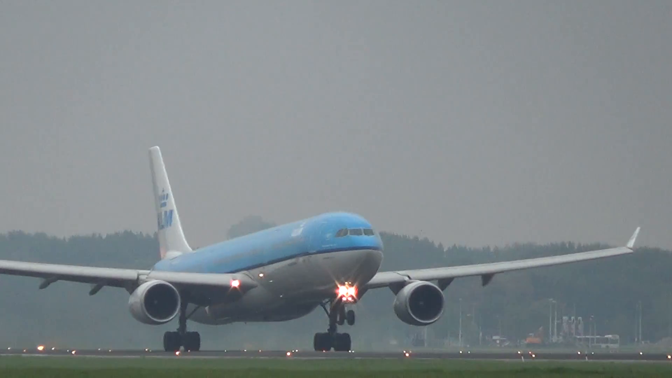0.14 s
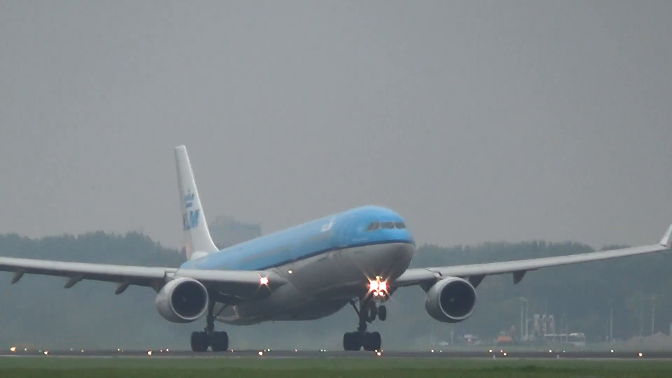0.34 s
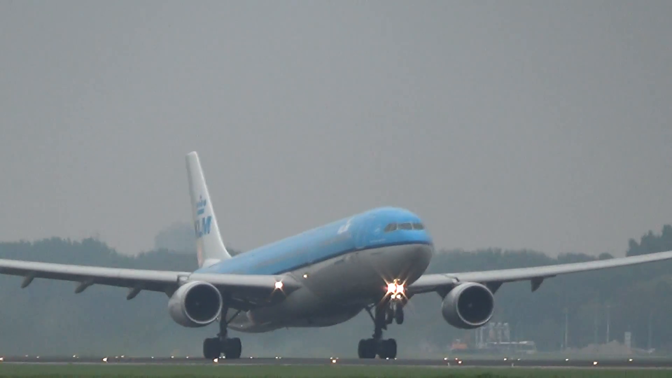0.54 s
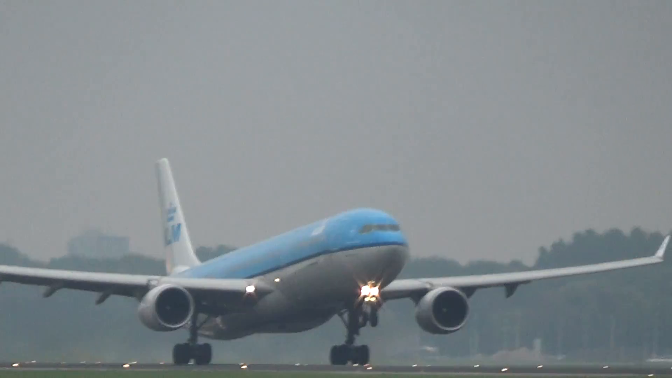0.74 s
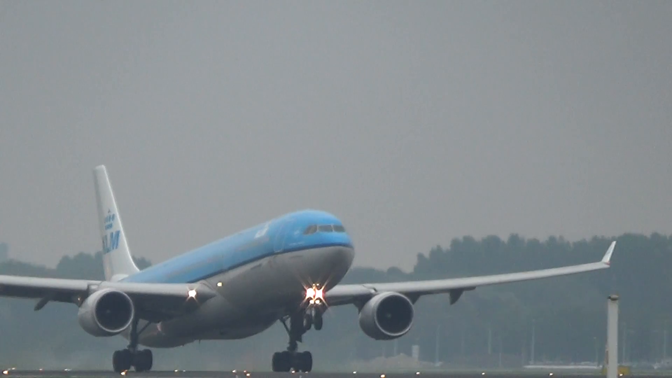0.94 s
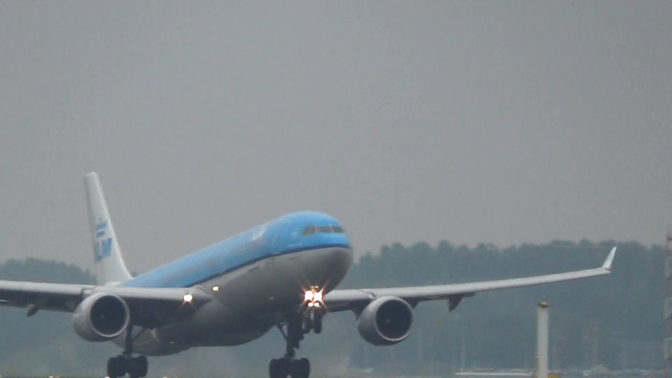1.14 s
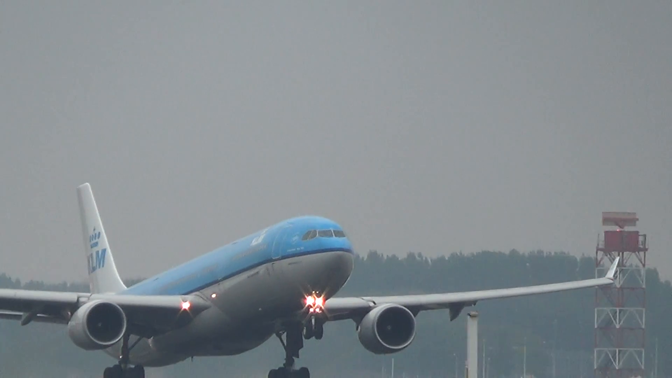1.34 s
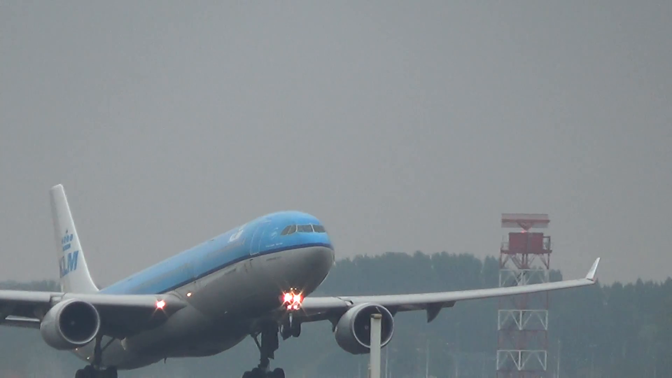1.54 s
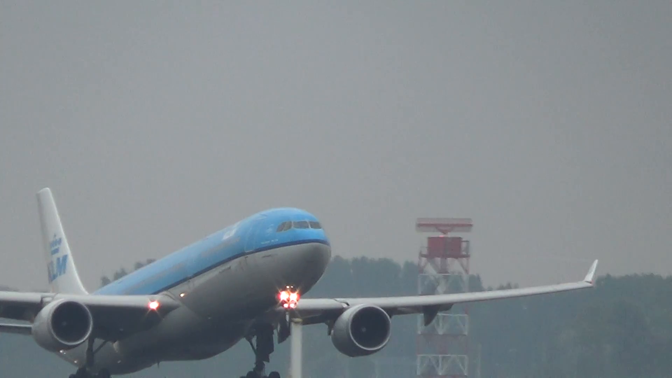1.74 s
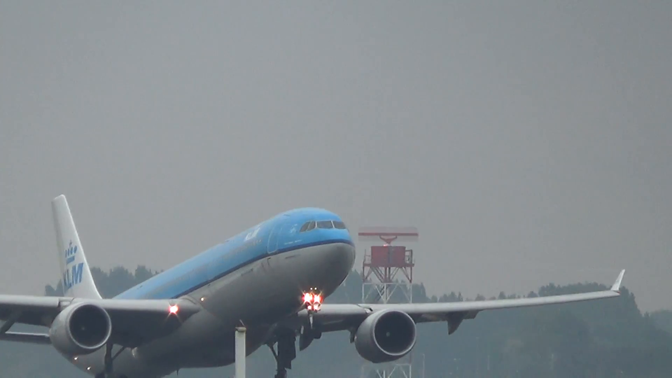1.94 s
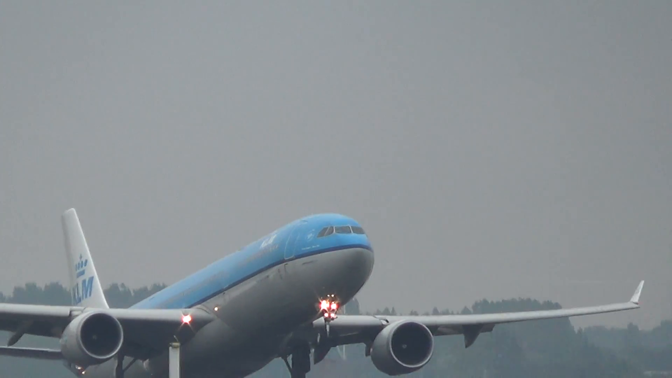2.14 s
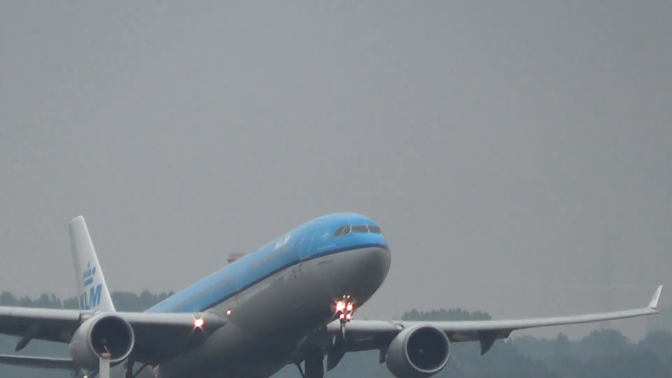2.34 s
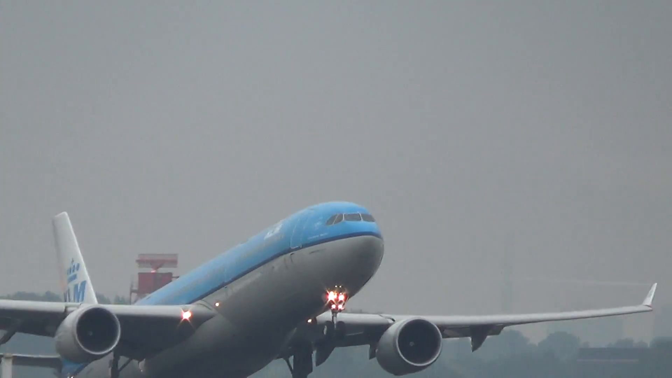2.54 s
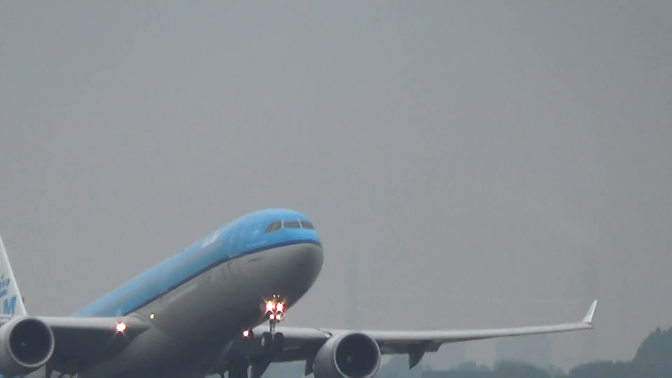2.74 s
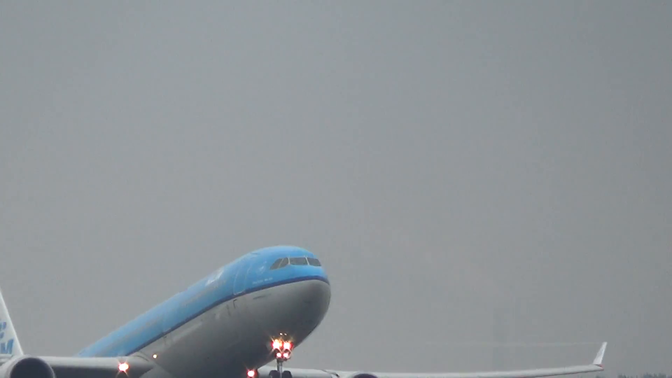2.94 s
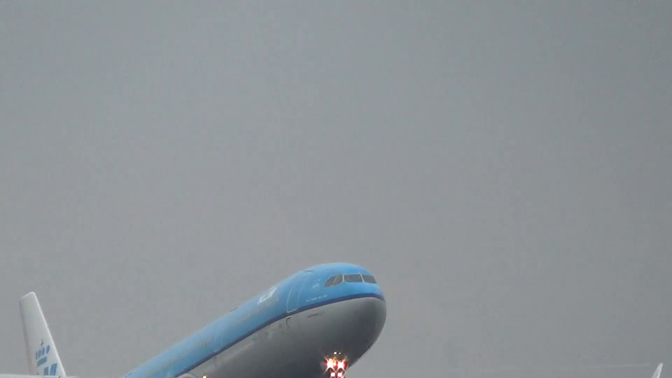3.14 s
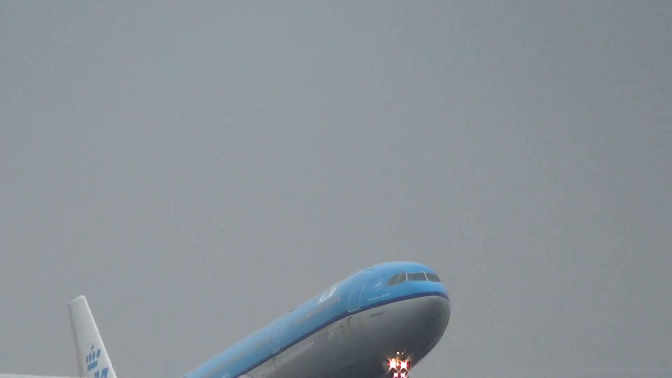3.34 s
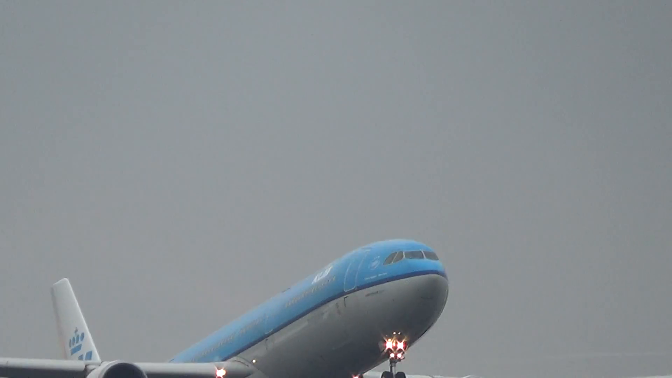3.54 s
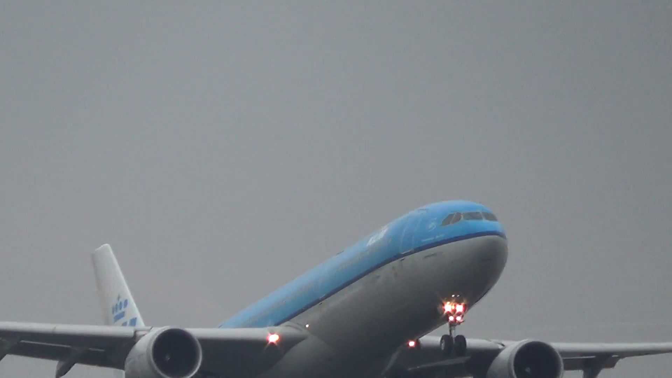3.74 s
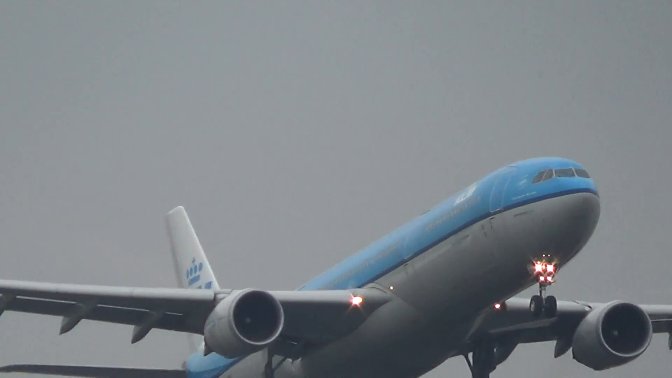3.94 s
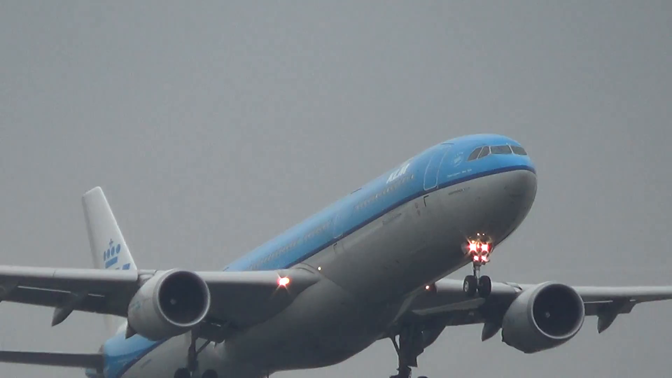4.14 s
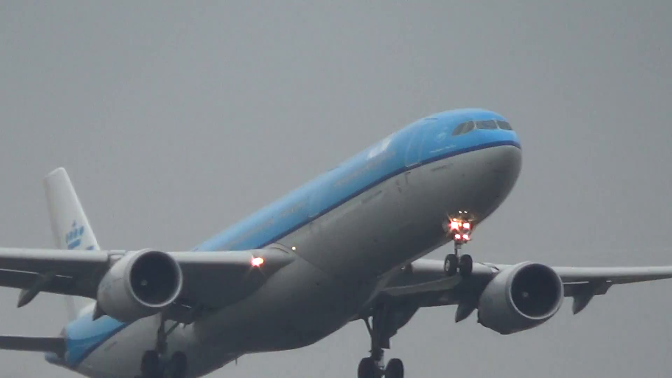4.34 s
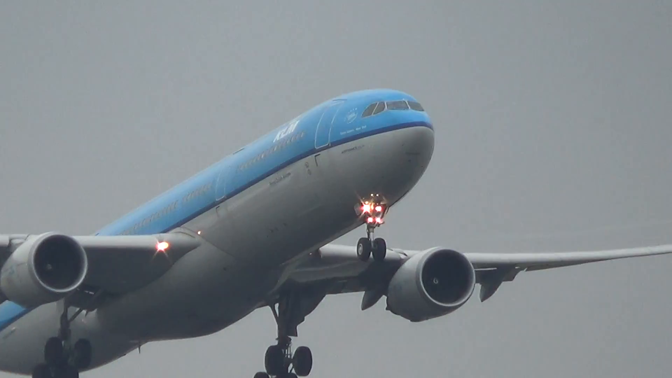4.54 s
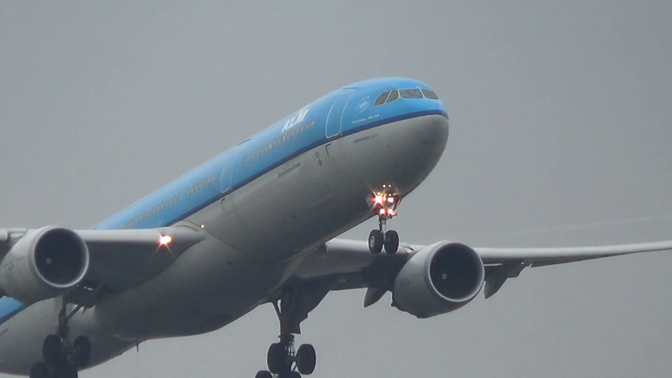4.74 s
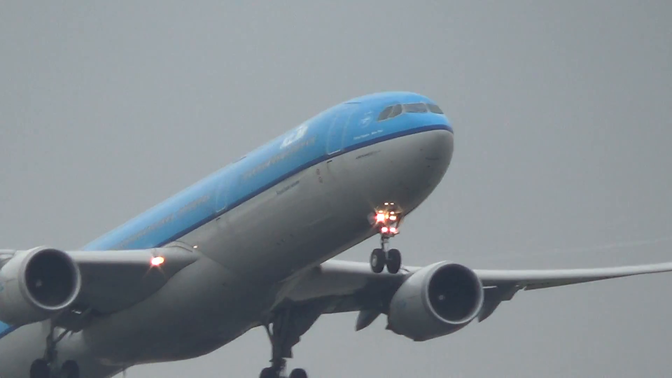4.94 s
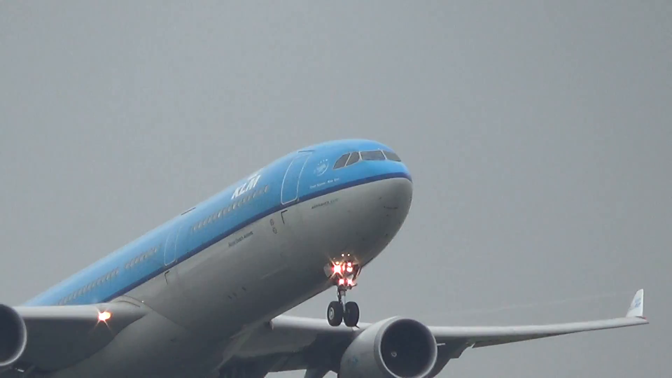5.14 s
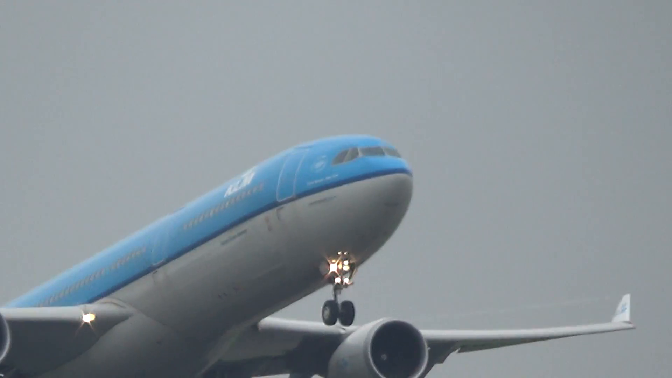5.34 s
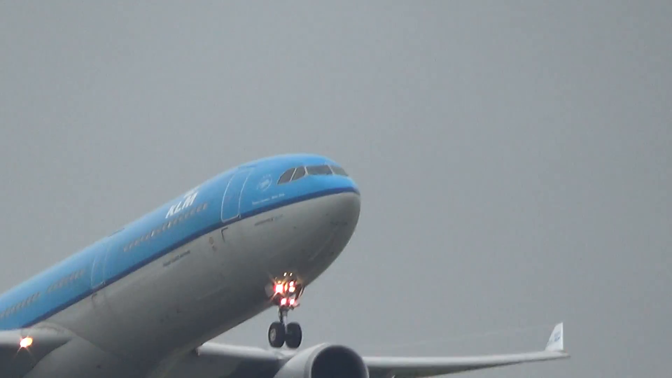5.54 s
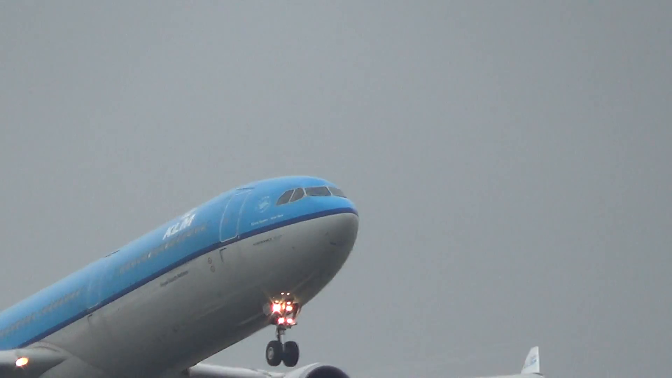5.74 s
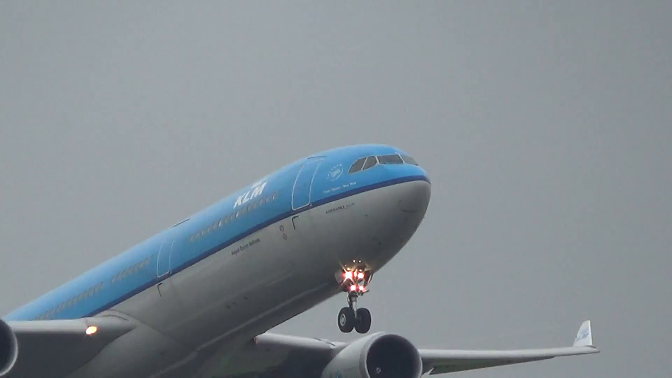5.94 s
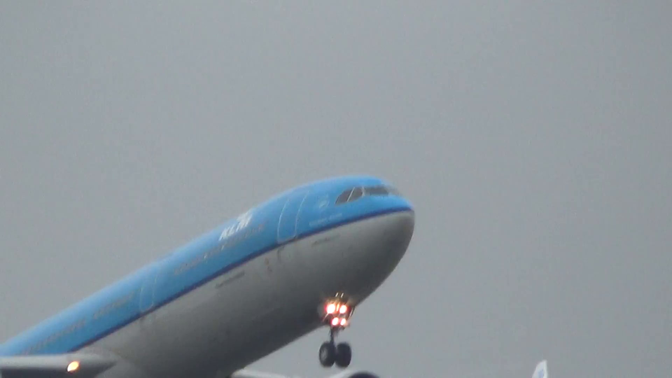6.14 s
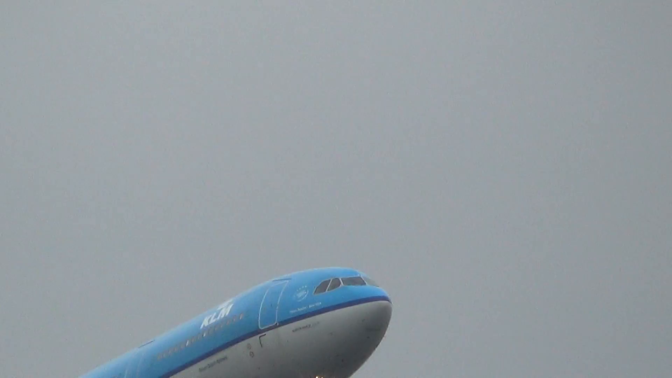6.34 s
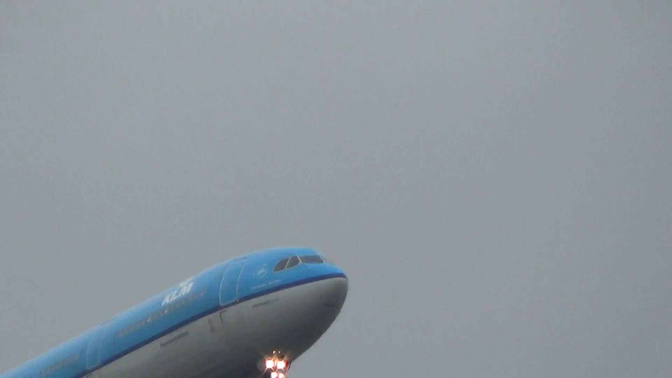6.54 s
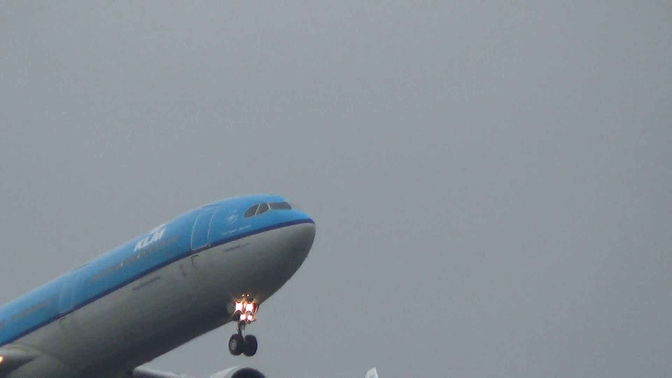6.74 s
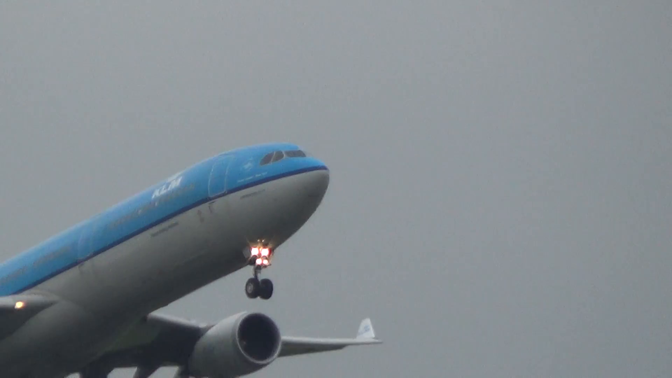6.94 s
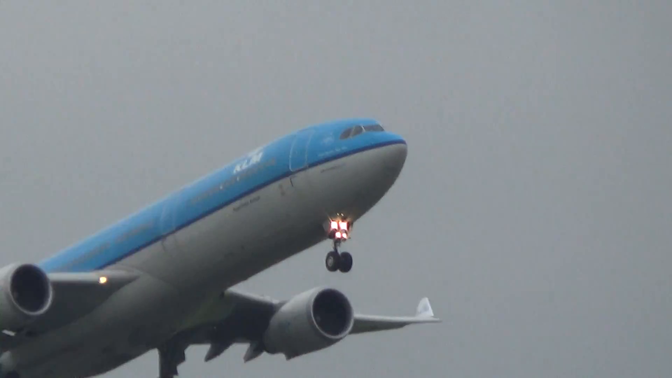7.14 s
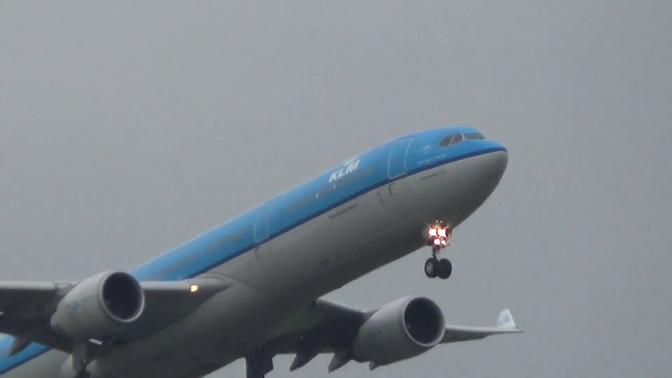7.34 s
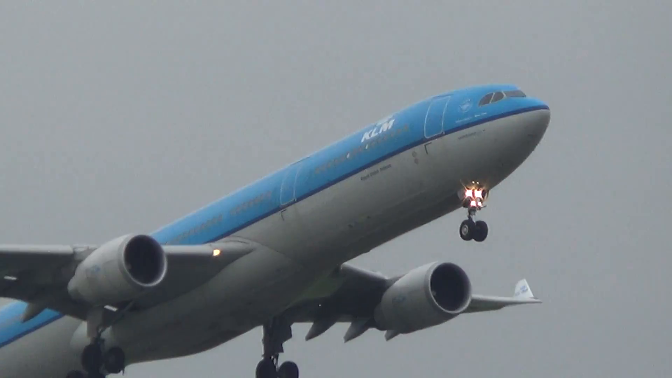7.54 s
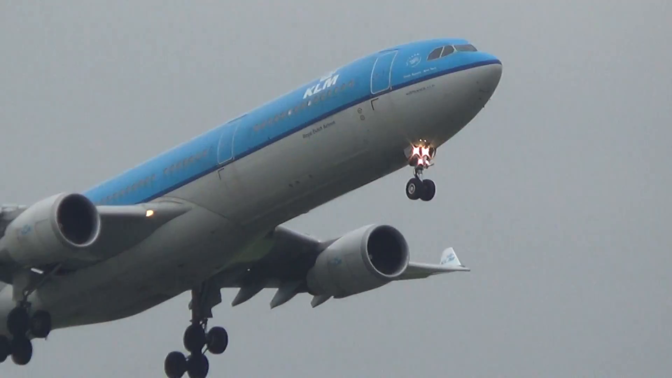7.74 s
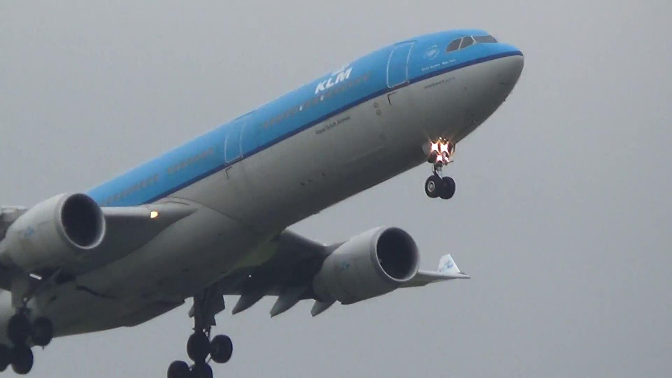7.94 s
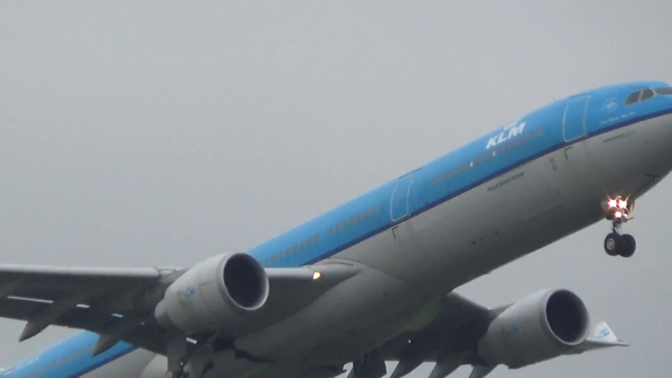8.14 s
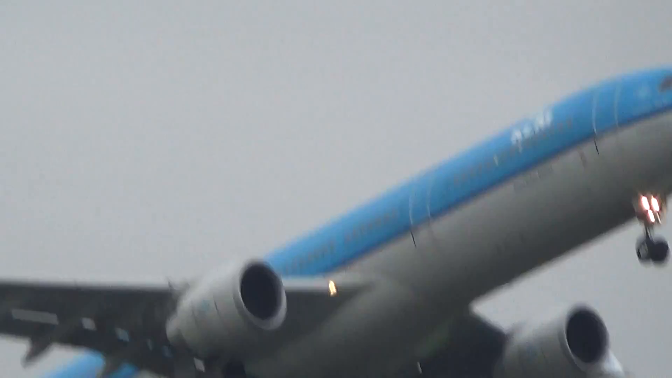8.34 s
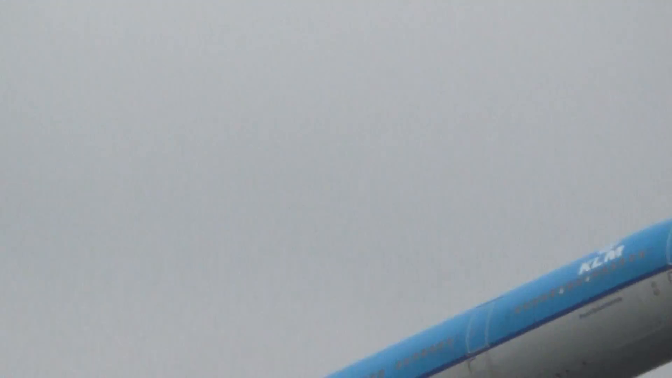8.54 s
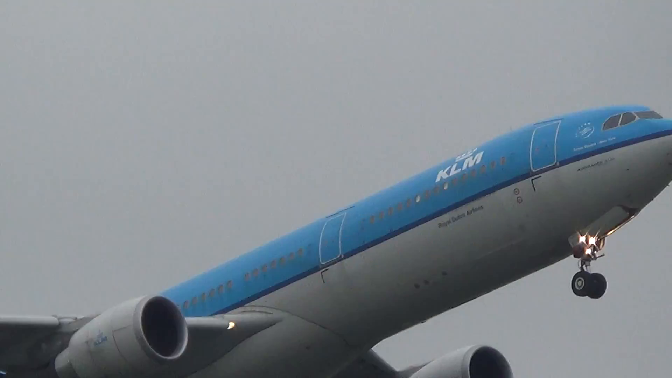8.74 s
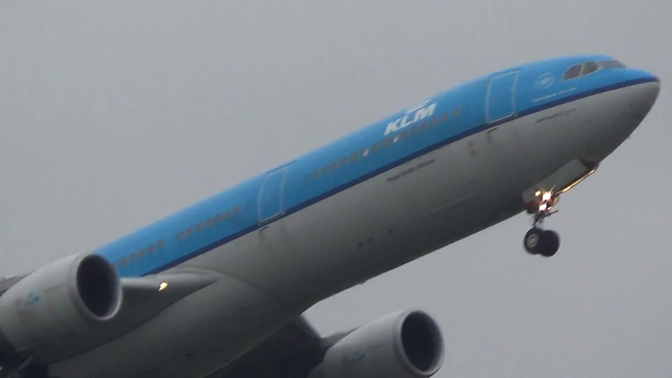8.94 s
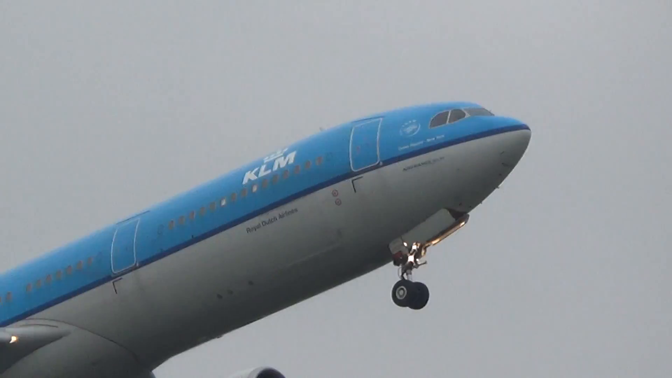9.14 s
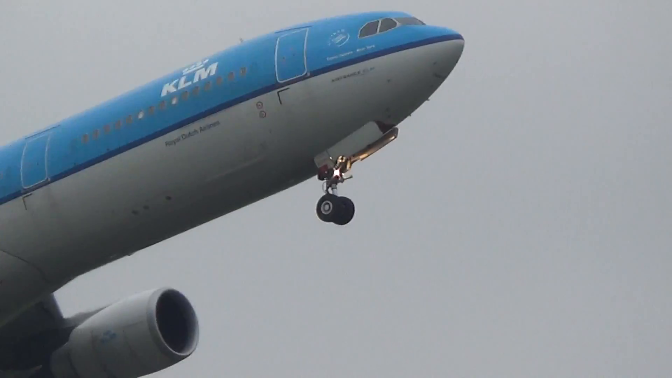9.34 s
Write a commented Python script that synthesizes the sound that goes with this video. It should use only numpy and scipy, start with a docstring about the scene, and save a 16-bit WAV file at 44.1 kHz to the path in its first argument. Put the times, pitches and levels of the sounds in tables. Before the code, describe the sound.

A small stereo microphone in gusty open air picks up a jetliner taking off. Wind thumps and flutters close by, with thin hiss, a very faint high whistle and a few dry handling ticks. The distant engine rush steadily grows louder and brighter. A brief harsh gust masks it late on; afterward the roar comes in waves with a strong, fluttering fan tone that finally sinks slightly in pitch. The aircraft never passes before the end.

```python
"""A twin-engine airliner at takeoff thrust runs towards the listener, over 9.5 seconds.
First it is far off: a dull fan rush and whine, wind on a small camera, ticks, hiss and a thin whistle.
As it nears, the fans grow louder and brighter; their pitch creeps up, then sinks towards the end.
Just before 7 s a sharp gust hisses and the level dips; then jet roar and whine come on strongly.
Rush, roar and wind are shaped noise, the whine is sines and narrow noise, the ticks are noise bursts."""
import sys
import numpy as np
from scipy.fft import rfft, irfft, next_fast_len
from scipy.io import wavfile

SR = 44100
rng = np.random.default_rng(int(sys.argv[2]) if len(sys.argv) > 2 else 0)


def to_wav(sig):
    """Store sig (one row per channel, or 1-D mono) as 16-bit WAV at the path in sys.argv[1].

    Samples outside -1..1 are clipped; the rate is SR.
    """
    pcm = np.clip(np.atleast_2d(sig), -1, 1) * 32767
    pcm = np.round(pcm).astype(np.int16)
    wavfile.write(sys.argv[1], SR, pcm.T)  # frames by channels


N = 418509
TIME = np.arange(N) / SR
SIZE = 2 * next_fast_len(N // 2 + 1, True)
FREQS = np.maximum(np.arange(SIZE // 2 + 1) * SR / SIZE, 1)
CUTOFF_HZ = 15850  # top of the sound


def from_db(db):
    """Decibels to gain."""
    return 10 ** (np.asarray(db) / 20)


def in_time(rows):
    """Each column of a curve, read at every sample."""
    seconds, *columns = np.transpose(rows)
    return [np.interp(TIME, seconds, column) for column in columns]


def over_hz(points):
    """A table over log frequency, read at every bin."""
    hz, value = np.transpose(points)
    return np.interp(np.log(FREQS), np.log(hz), value)


def white():
    """Random spectrum of white noise."""
    return rng.standard_normal(len(FREQS)) + 1j * rng.standard_normal(len(FREQS))


def unit_in_band(gain, band):
    """Scale a spectrum so that its noise has rms 1 between two frequencies."""
    inside = (FREQS > band[0]) & (FREQS < band[1])
    return gain * SIZE / (2 * np.sqrt(np.sum(gain[inside] ** 2)))


def to_wave(spectrum):
    """From frequency bins to samples."""
    return irfft(spectrum, SIZE)[..., :N]


def noise(gain, band=(0, SR)):
    """Noise of the given colour, with rms 1 inside the band."""
    return to_wave(white() * unit_in_band(gain, band))


def drift(rate_hz):
    """A slow random curve of spread 1, changing about rate_hz times a second."""
    return noise(1 / (1 + (FREQS / rate_hz) ** 2))


def narrow_noise(phase, width_hz):
    """A tone smeared into a narrow band by two random envelopes; rms 1."""
    return drift(width_hz) * np.cos(phase) + drift(width_hz) * np.sin(phase)


def swell(middle_s, width_s):
    """A smooth rise and fall of height 1 around a moment."""
    return np.exp(-np.minimum(((TIME - middle_s) / width_s) ** 2, 50))


def swelling(rows):
    """Brief swells with two rises each, added up into two level curves in dB."""
    return sum(np.outer(rises_db, swell(middle_s, width_s)) for middle_s, width_s, *rises_db in rows)


# hiss and whistle sink steadily once the aircraft is near
HISS_START_DB, WHISTLE_START_DB, WHISTLE_HZ = -61.5, -64, 15625
FADE_FROM_S, HISS_FADE_DB_PER_S, WHISTLE_FADE_DB_PER_S = 5.7, 1.5, 1.5
# small ticks on the camera body: start_s, level_db (before the shared tick_trim_db)
TICKS = [(0.0987, -39), (.355, -39), (.4259, -42), (3.637, -29.5), (4.0433, -24), (5.822, -35),
         (7.5632, -36)]
# tone colour of a tick: pitch_hz, relative_level_db (per Hz)
TICK_COLOUR = [(1500, -22), (4200, 10.5), (6000, -3), (10000, -6), (15000, -21)]


def camera(tick_trim_db=-4.5, tick_decay_s=0.0022):
    """Preamplifier hiss, a thin electronic whistle and short dry ticks of the housing."""
    fading_s = np.maximum(TIME - FADE_FROM_S, 0)
    hiss_db = HISS_START_DB - HISS_FADE_DB_PER_S * fading_s
    whistle_db = WHISTLE_START_DB - WHISTLE_FADE_DB_PER_S * fading_s
    hiss_colour = from_db(over_hz([(1000, -5.5), (7000, 2.5), (15000, 0.0)]))
    hiss = from_db(hiss_db) * noise(hiss_colour, (4000, CUTOFF_HZ))
    whistle = from_db(whistle_db) * np.sqrt(2) * np.sin(2 * np.pi * WHISTLE_HZ * TIME)
    bursts = 0
    for start_s, level_db in TICKS:
        decay = np.exp(-np.minimum(np.abs(TIME - start_s) / tick_decay_s, 20))
        bursts = bursts + from_db(level_db + tick_trim_db) * (TIME >= start_s) * decay
    return hiss + whistle + bursts * noise(from_db(over_hz(TICK_COLOUR)))


# faint high notes that swell now and then: middle_s, width_s, pitch_hz, level_db
SINGING = [(2.55, 0.23, 3210, -53), (5.92, 0.15, 3050, -45)]


def singing(width_hz=80):
    """Faint narrow bands of noise that rise and sink again."""
    notes = 0
    for middle_s, width_s, pitch_hz, level_db in SINGING:
        note = narrow_noise(2 * np.pi * pitch_hz * TIME, width_hz)
        notes = notes + from_db(level_db) * swell(middle_s, width_s) * note
    return notes


# the steady wind under the gusts: time_s, level_db
BREEZE = [(0, -38.5), (1.2, -32), (3.6, -28.5), (5.5, -32.5), (5.95, -21.5), (6.85, -22), (7.3, -28),
          (8.7, -25.5), (9.49, -31.5)]
# gusts on the microphone: middle_s, width_s, rise_db
GUSTS = [(.315, 0.017, 14.5), (.66, .05, 6), (.88, .025, 6), (1.48, 0.053, 4.5), (1.75, 0.055, 2.5),
         (2.24, 0.033, 3.5), (2.6, .09, 8.5), (2.739, .035, 10), (2.91, 0.063, 6), (3.16, 0.043, 5),
         (4.03, 0.022, 2.5), (4.6, 0.091, 4), (4.89, 0.028, 4.5), (6.92, 0.019, 5.5), (7.82, 0.28, 5),
         (9.05, 0.046, 0.5)]


def wind_strength():
    """Buffeting in dB: the breeze, and the rise of the gusts that ride on it."""
    breeze_db = in_time(BREEZE)[0]
    gust_db = sum(rise_db * swell(middle_s, width_s) for middle_s, width_s, rise_db in GUSTS)
    return breeze_db, gust_db


# slow air pressure on the camera body: pitch_hz, relative_level_db (per Hz)
RUMBLE = [(12, -22.5), (40, -5), (70, 9.5), (120, -6), (300, -28), (2000, -100)]


def rumble(level_db=-49.0, lump_db=2.5, follow=0.68):
    """Large eddies press on the whole camera, much alike at both ports and harder in gusts."""
    _, gust_db = wind_strength()
    colour = from_db(over_hz(RUMBLE))
    ports = noise(colour) + .45 * np.array([noise(colour), noise(colour)])
    return ports * from_db(level_db + follow * gust_db + lump_db * drift(10))


SHARP_GUST_FROM_S, SHARP_GUST_TO_S = 6.78, 6.96


def sharp_gust():
    """1 while the sharp gust blows, 0 otherwise, with edges of 20 ms."""
    inside_s = np.minimum(TIME - SHARP_GUST_FROM_S, SHARP_GUST_TO_S - TIME)
    return np.clip(inside_s / .02 + .5, 0, 1)


SHARP_GUST_DB = -15
# tone colour of the buffeting: pitch_hz, relative_level_db (per Hz)
WIND = [(20, -40.5), (45, -31), (80, -6), (130, 0.5), (220, 2), (350, -0.5), (550, -6.5), (900, -14),
        (1600, -27), (3200, -35), (7000, -58), (15000, -82)]
# tone colour of the sharp gust's hiss: pitch_hz, relative_level_db (per Hz)
PORT_HISS = [(100, -14.5), (380, 4.5), (800, -4.5), (1600, -9), (3000, -29.5), (6000, -61), (15000, -85)]
# how far the left port leads the right: pitch_hz, lead_radians
WIND_LEAD = [(40, 0.7), (130, 0.5), (260, 1.25), (500, 1.55), (1000, 1.3), (3000, 1)]
# how alike the wind is at the two ports: pitch_hz, likeness_0_to_1
WIND_LIKENESS = [(30, 1), (100, 0.89), (400, 0.97), (1000, 0.75), (4000, 0.17)]


def wind(lump_db=1.0, rasp_db=1.65):
    """Eddies sweep over the left port, then the right; they come in lumps, and the small ones in bursts."""
    strength_db = sum(wind_strength())
    colour = unit_in_band(from_db(over_hz(WIND)), (70, 350))
    alike = np.clip(over_hz(WIND_LIKENESS), 0, 1)
    lead = np.exp(.5j * over_hz(WIND_LEAD) * [[1], [-1]])  # half the lead on each side
    shared = np.sqrt(alike) * white() * lead
    separate = np.sqrt(1 - alike) * np.array([white(), white()])
    ports = colour * (shared + separate)
    small = FREQS ** 2 / (FREQS ** 2 + 400 ** 2)  # small eddies make the higher part
    eddies = to_wave(ports * (1 - small)) + to_wave(ports * small) * from_db(rasp_db * drift(24))
    buffeting = eddies * from_db(strength_db + lump_db * drift(9.9))
    hiss = np.array([noise(from_db(over_hz(PORT_HISS))) for port in range(2)])
    return buffeting + hiss * sharp_gust() * from_db(SHARP_GUST_DB)


# reflections around the microphone carve fixed dips: pitch_hz, width_hz, depth_db
DIPS = [(550, 90, -3), (945, 130, -9), (1510, 130, -4), (2100, 230, -4), (2660, 130, -5), (3180, 170, -4),
        (6850, 450, -4)]


def airborne(spectrum):
    """Gain per bin of a distant sound after the reflections around the microphone."""
    dips_db = sum(depth * np.exp(-2 * ((FREQS - hz) / width) ** 2) for hz, width, depth in DIPS)
    return from_db(over_hz(spectrum) + dips_db)


# exhaust jets: time_s, level_db (before surges and beaming)
JETS = [(0, -36), (3.5, -33), (5.5, -30), (7.2, -26), (8.0, -21.5), (9.0, -24)]
# the roar surges: middle_s, width_s, rise_db, small_over_large_eddies_db
SURGES = [(7.22, 0.15, 3.5, 4.5), (8.32, 0.28, 5.5, 6), (9.37, .16, 5, -0.5)]
# tone colour of the roar: pitch_hz, relative_level_db (per Hz)
ROAR = [(30, -31.5), (90, -19.5), (280, -13.5), (460, 5.5), (720, 7), (900, 6), (1200, -8.5), (2500, -51.5),
        (8000, -87.5)]


def jet_roar(far_db=-6.0, near_db=-4.0, billow_db=0.88, pivot_hz=520):
    """Turbulent mixing behind the engines, beamed more to the listener as the aircraft nears."""
    surge_db, bright_db = swelling(SURGES)
    roar_db = in_time(JETS)[0] + surge_db
    beam_db = np.interp(TIME, [5.5, 7.5], [far_db, near_db])
    source = white() * unit_in_band(airborne(ROAR), (550, 850))
    large = 1 / (1 + (FREQS / pivot_hz) ** 6)  # the large eddies carry the low part of the roar
    roar = to_wave(source * (1 - large)) + to_wave(source * large) * from_db(-bright_db)
    return roar * from_db(roar_db + beam_db + billow_db * drift(32))


# the run: the aircraft comes abeam only after the sound has ended
START_SPEED_M_PER_S, ACCEL_M_PER_S2, SOUND_M_PER_S = 72, 2, 343
ABEAM_S, ABEAM_M = 11.8, 225  # when it comes abeam, and how far off


def flight():
    """Nearness (dB above the start) and Doppler factor of an aircraft gathering speed on a straight line."""
    speed = START_SPEED_M_PER_S + ACCEL_M_PER_S2 * TIME
    left_s = ABEAM_S - TIME
    to_go = left_s * (speed + .5 * ACCEL_M_PER_S2 * left_s)
    distance = np.hypot(to_go, ABEAM_M)
    near_db = 20 * np.log10(distance[0] / distance)
    closing_speed = speed * to_go / distance
    return near_db, 1 / (1 - closing_speed / SOUND_M_PER_S)


# tone colour of the fan rush: pitch_hz, relative_level_db (per Hz)
RUSH = [(700, -19.5), (1020, 1), (1300, 1), (1800, 0), (2250, 0.5), (2480, 0.5), (2650, -2), (3500, -6.5),
        (4300, -13), (5000, -13), (5500, -22.5), (6100, -23), (6900, -31), (7500, -32), (9000, -40.5),
        (15000, -56)]


def fan_rush(rush_db, treble_db, near_treble_db=-7.5, twinkle_db=0.5, shared_db=0.97, absorb_hz=3300):
    """Broadband fan noise: the air takes treble in step with frequency, and each band twinkles on the way."""
    source = white() * unit_in_band(airborne(RUSH), (1100, 2200))
    centres = np.geomspace(1000, 11000, 10)
    together_db = shared_db * drift(21)  # all bands waver together
    treble_change_db = np.minimum(treble_db - near_treble_db, 2)
    rush = 0
    for hz, pick in zip(centres, np.eye(len(centres))):
        band = to_wave(source * np.interp(FREQS, centres, pick))
        air_db = treble_change_db * max(hz - 1600, 0) / absorb_hz
        rush = rush + band * from_db(air_db + together_db + twinkle_db * drift(6.8))
    return rush * from_db(rush_db)


BLADE_HZ = 1971  # blade tone as heard on board
# the second fan runs a little faster, so the two tones beat
SECOND_FAN_HZ, SECOND_FAN_DB = 13, -8.5
# fan blade tone: time_s, level_over_rush_db, share_scattered (held between 0 and 1)
FAN = [(0, -12, 0.2), (3.5, -10.5, 1), (6.7, -6, 1.06), (7.3, -2.5, 0.6), (8.25, -6.5, 0.42),
       (8.65, 1.5, 0.25), (9.15, 1.5, 0.15), (9.49, -1, 0.03)]
# engine tones: multiple_of_blade_tone, relative_level_db (before air loss), width_hz
TONES = [(.555, -9.5, 5.4), (.682, -23.5, 25), (1.125, -16, 25), (1.424, -19.5, 35), (1.62, -29, 30),
         (1.876, -24, 45), (2.002, -21.5, 23)]


def fan_whine(rush_db, treble_db, doppler, flutter_db=1.3, smear_hz=30, waver_hz=7):
    """The tone of the fan blades; turbulence on the way bends it, makes it flutter and scatters it."""
    tone_db, scattered = in_time(FAN)
    scattered = np.clip(scattered, 0, 1)
    phase = 2 * np.pi * np.cumsum(BLADE_HZ * doppler + waver_hz * drift(14.9)) / SR
    beat_phase = 2 * np.pi * np.cumsum(SECOND_FAN_HZ + waver_hz * drift(5.9)) / SR
    second = from_db(SECOND_FAN_DB) * np.sin(phase + beat_phase)
    clean = np.sqrt(2) * (np.sin(phase) + second) * from_db(flutter_db * drift(22))
    whine = np.sqrt(1 - scattered) * clean + np.sqrt(scattered) * narrow_noise(phase, smear_hz)
    air_db = treble_db - treble_db.max()  # from afar the upper tones are lost in the air
    for multiple, level_db, width_hz in TONES:
        gain = from_db(level_db + air_db * max(multiple - 1, 0))
        whine = whine + gain * narrow_noise(multiple * phase, width_hz)
    return whine * from_db(rush_db + tone_db)


# treble near 5 kHz relative to the rush: at the start, and dB gained per dB of nearness
FAR_TREBLE_DB, TREBLE_GROWTH = -30.5, 2.155
# the approach: time_s, fan_rush_level_db (before swells)
APPROACH = [(0, -39), (2.9, -39), (5.6, -32.5), (6.3, -30.5), (6.95, -25.5), (7.25, -20), (7.85, -22),
            (8.2, -23.5), (9.49, -20)]
# the fans change briefly: middle_s, width_s, rush_rise_db, further_treble_rise_db
SWELLS = [(.3, 0.8, -1, 2.5), (2.55, 0.14, 1, 4), (6.58, 0.19, 3.5, 0.5), (7.66, 0.076, 1, 3),
          (8.25, 0.3, 3.5, 3)]
# where the aircraft is: time_s, left_minus_right_db
BEARING = [(0, 1), (8.3, 3), (9.49, 4.5)]


def scene():
    """The aircraft a little to the left, a trace of it scattered by the airfield, wind and camera close by."""
    swell_db, bright_db = swelling(SWELLS)
    rush_db = in_time(APPROACH)[0] + swell_db
    near_db, doppler = flight()
    treble_db = FAR_TREBLE_DB + TREBLE_GROWTH * near_db + bright_db
    pan_db = in_time(BEARING)[0] * np.array([[.5], [-.5]])
    fans = fan_rush(rush_db, treble_db) + fan_whine(rush_db, treble_db, doppler)
    aircraft = (fans + jet_roar()) * from_db(pan_db)
    # the direct sound takes over as the aircraft nears
    diffuse_db = np.interp(TIME, [5, 7.2], [-14, -24])
    delayed = np.interp(TIME - .06, TIME, aircraft.mean(axis=0))
    scattered = from_db(diffuse_db) * delayed * np.array([[1], [-1]])  # opposite sign on the two sides
    return aircraft + scattered + wind() + rumble() + singing() + camera()


DIP_DB = -4  # level change while the sharp gust lasts


def record(dry):
    """The level dips briefly, the highest peaks are rounded, and the top is cut steeply."""
    dipped = dry * from_db(DIP_DB * sharp_gust())
    rounded = dipped / (1 + (dipped / .95) ** 12) ** (1 / 12)
    return to_wave(rfft(rounded, SIZE) / np.sqrt(1 + (FREQS / CUTOFF_HZ) ** 400))


dry = scene()
out = record(dry)
to_wav(out)
```